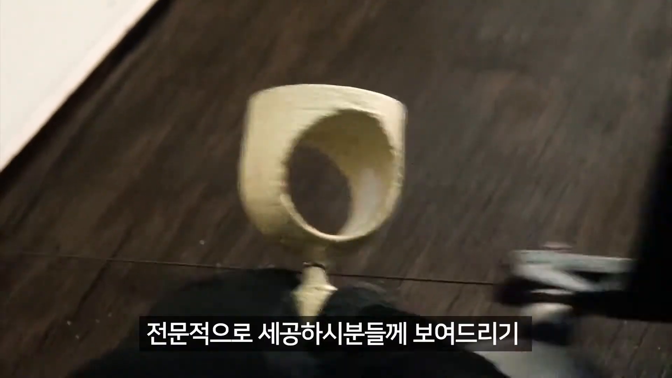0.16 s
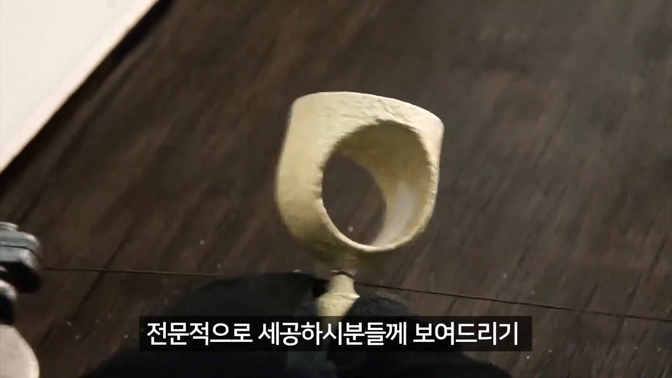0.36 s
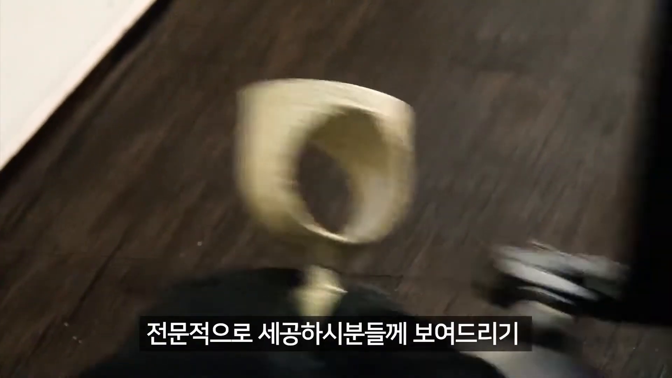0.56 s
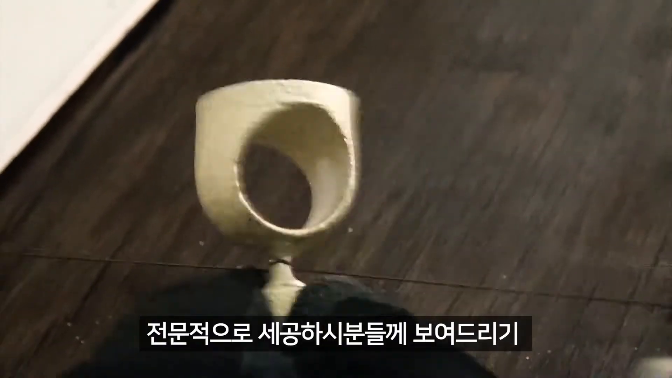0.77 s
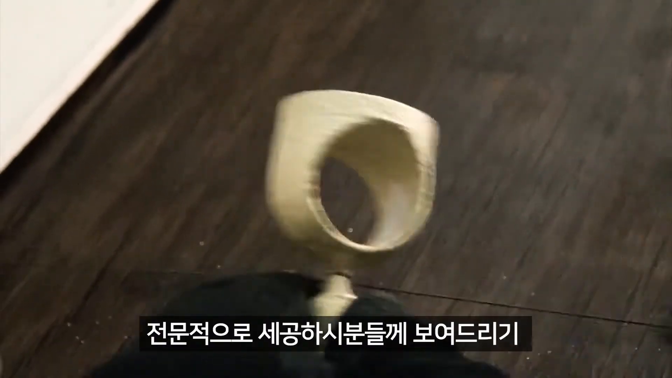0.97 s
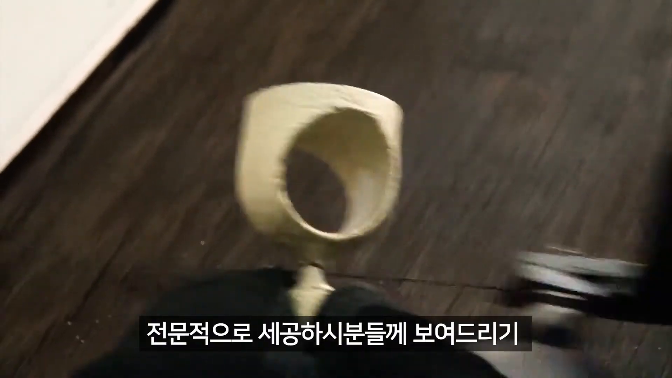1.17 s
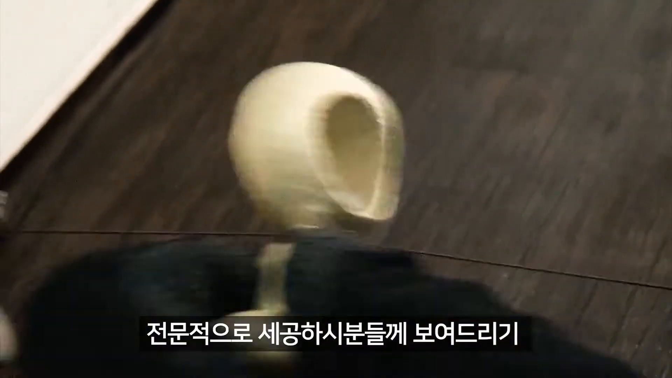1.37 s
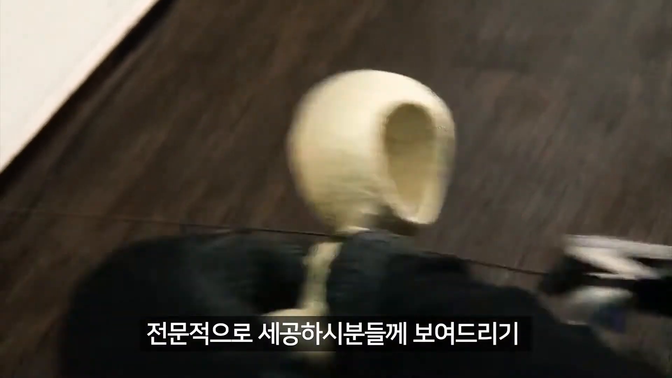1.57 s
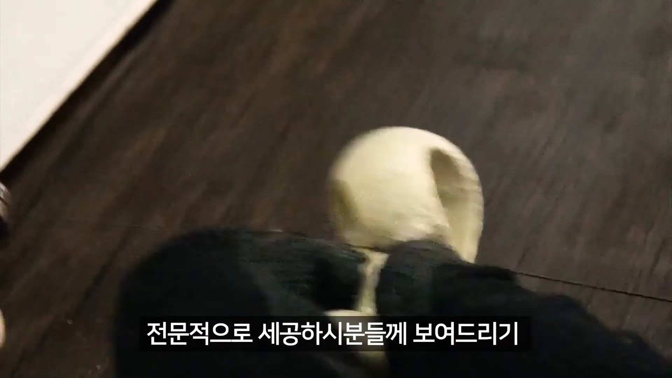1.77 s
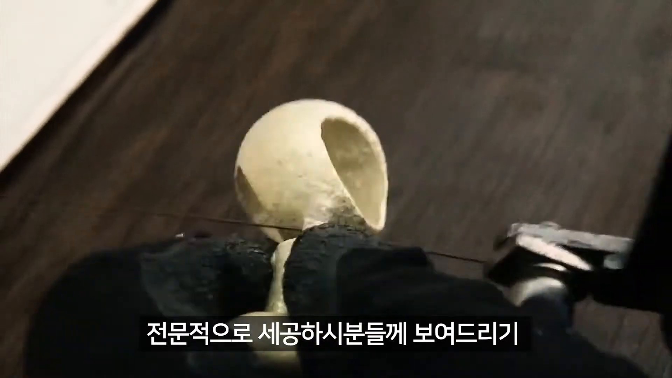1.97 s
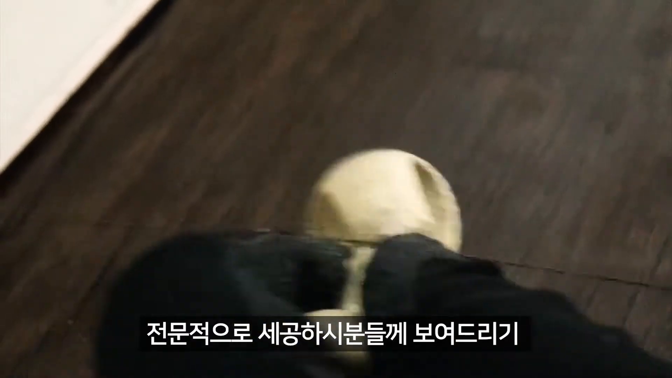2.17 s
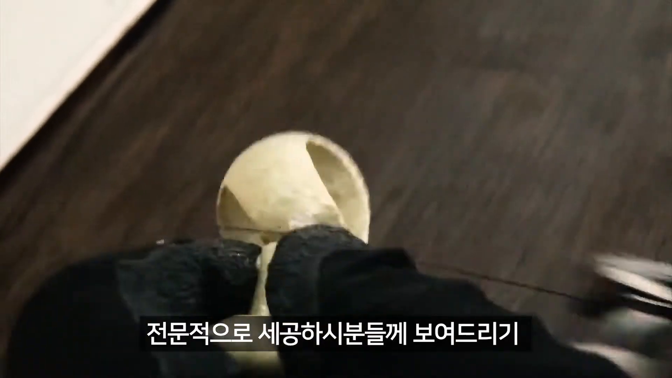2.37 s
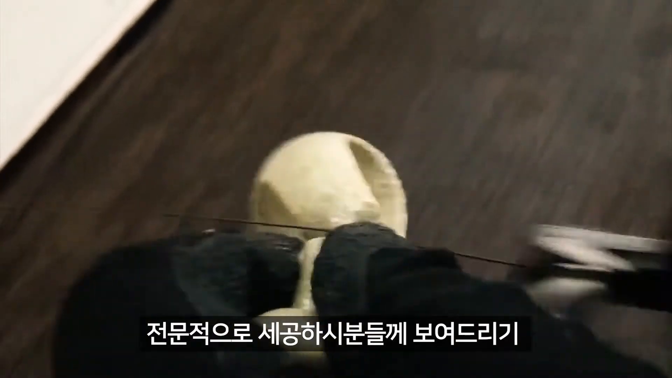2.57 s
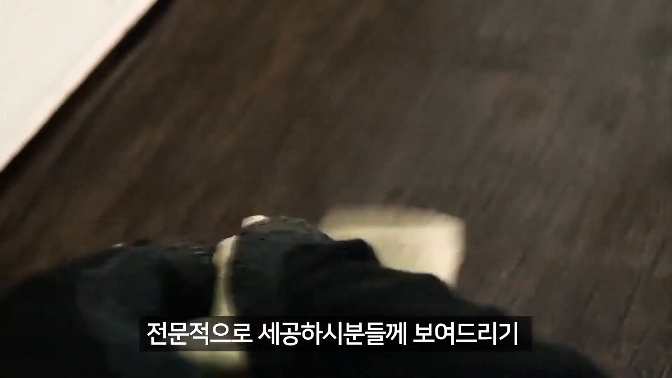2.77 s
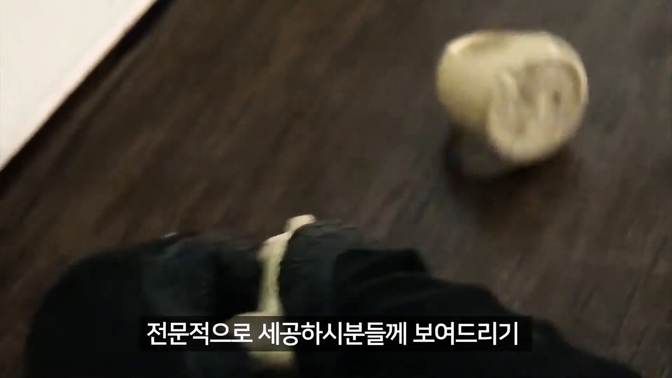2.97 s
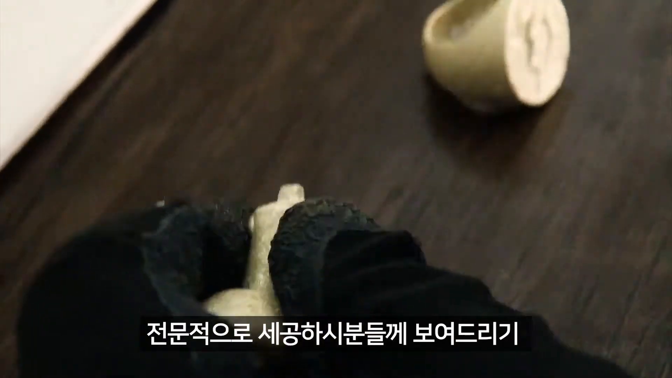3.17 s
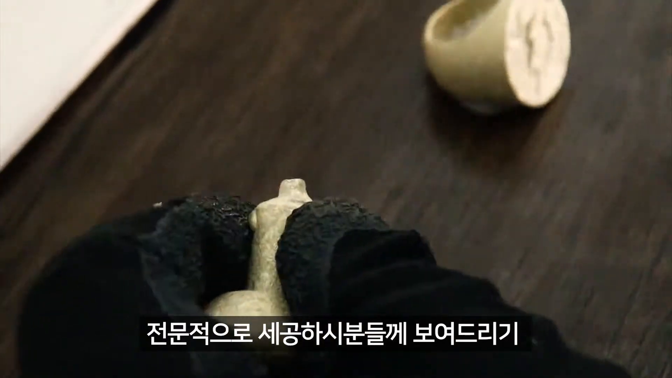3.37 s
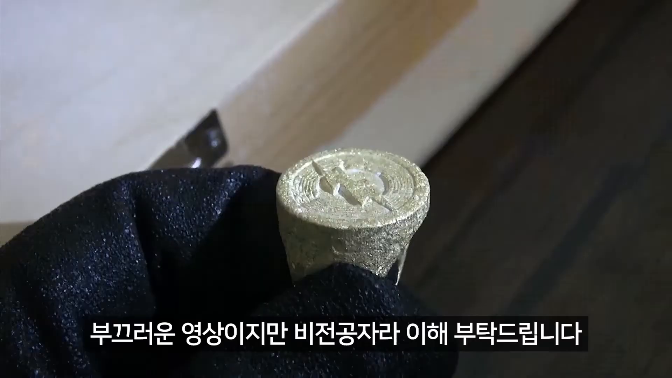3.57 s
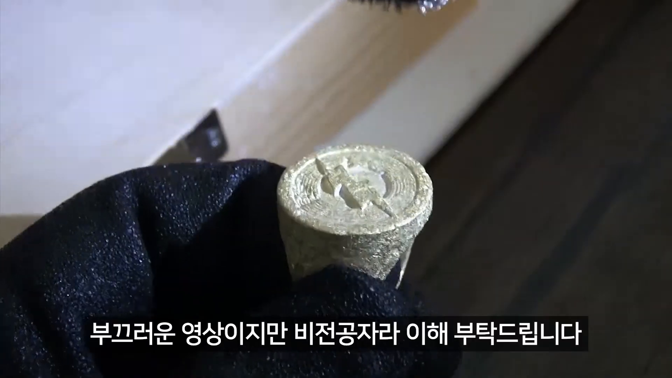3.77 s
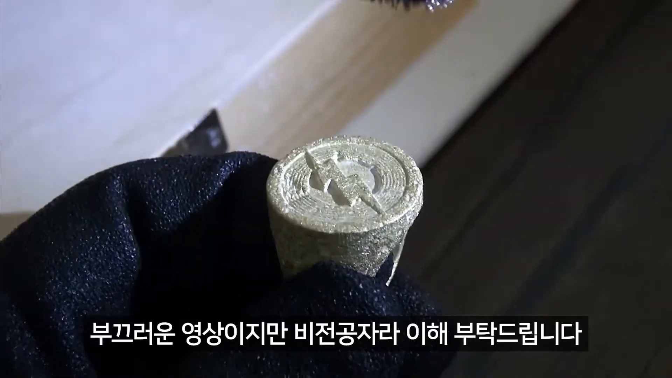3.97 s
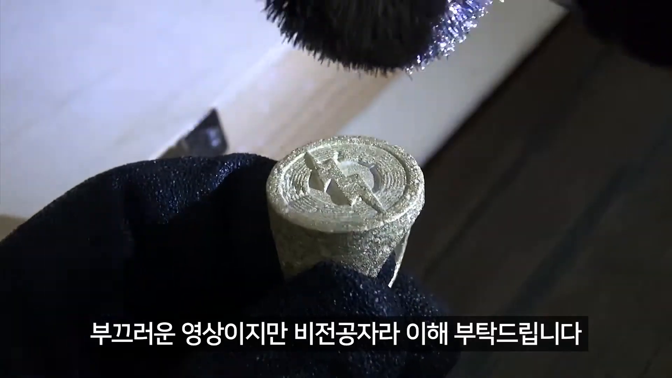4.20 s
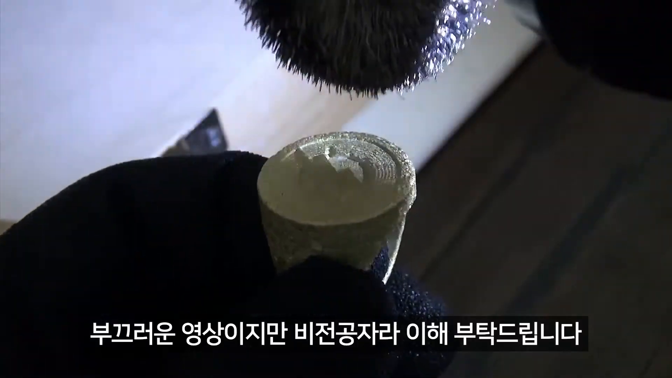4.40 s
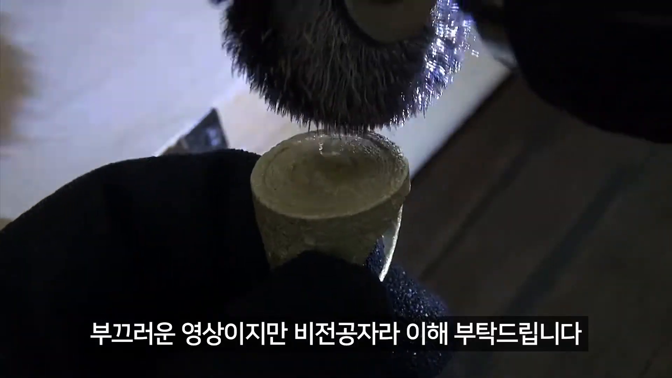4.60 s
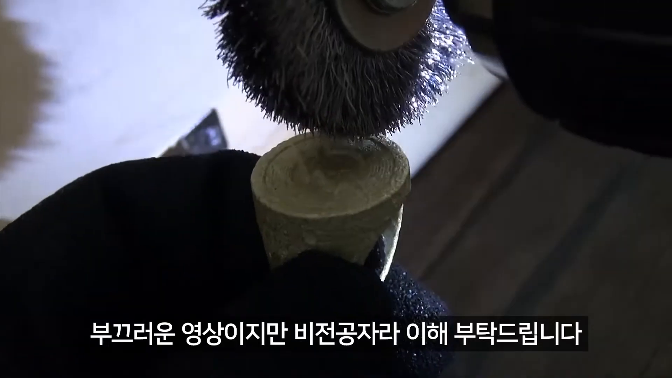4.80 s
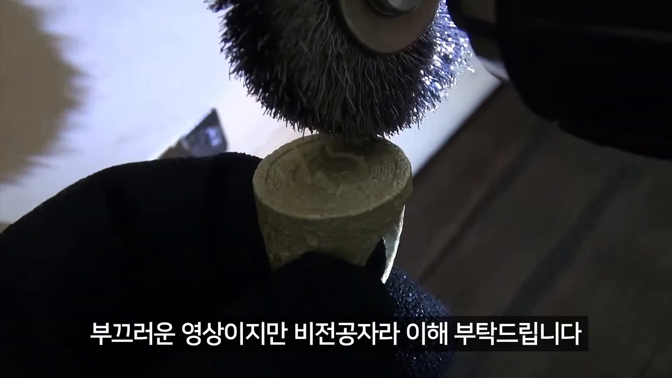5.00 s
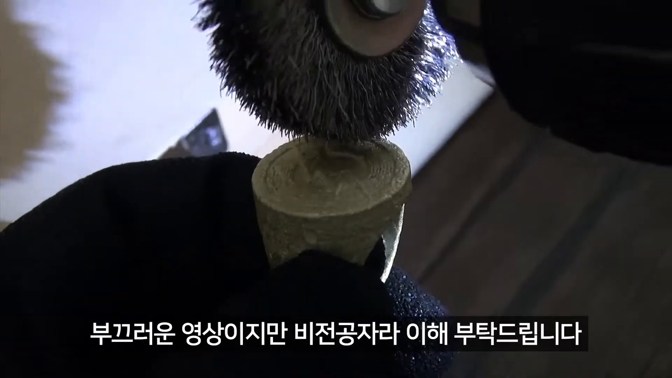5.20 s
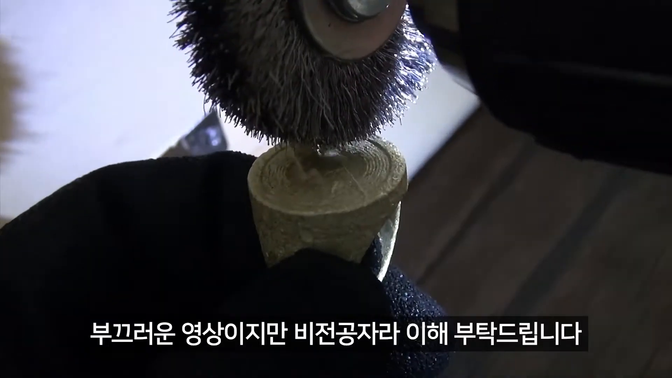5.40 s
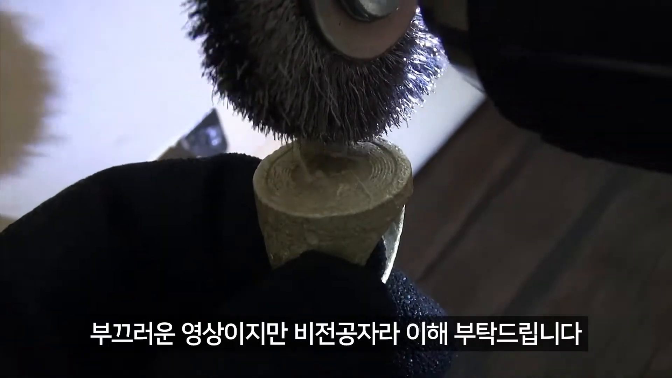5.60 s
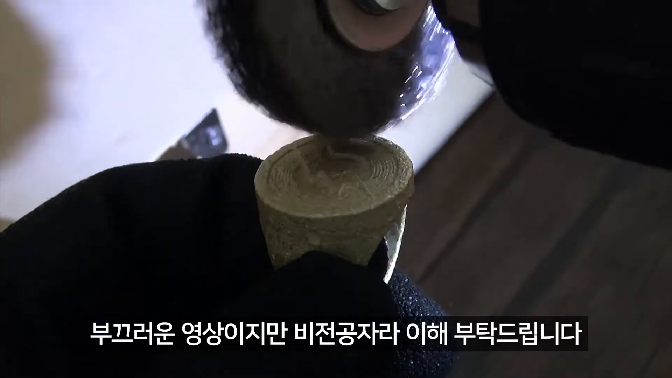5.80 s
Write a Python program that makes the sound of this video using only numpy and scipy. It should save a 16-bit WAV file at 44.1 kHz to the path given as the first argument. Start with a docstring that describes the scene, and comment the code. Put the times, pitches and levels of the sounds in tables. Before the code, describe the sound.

Close to the microphone, a fine saw rasps through a small metal casting in quick, regular strokes with squeaks and squeals over a low bench rumble. The stem snaps with a bright crackle, and the ring bounces and rolls on a wooden table until still. Near-silence follows, with a soft thud and tiny ticks, before a small rotary tool whines and its brush wheel hisses louder.

```python
"""Sawing a ring off its stem at a workshop bench

Close to the microphone a thin saw cuts a cast metal ring off its stem in quick strokes: tooth grit rasps,
blade modes squeal, the bench rumbles. The stem snaps in a crackle; the ring rattles over a wooden table as
knocked modes and rolling grit. Soft thuds and dry ticks follow, then a rotary tool starts: its speed control
whines in steady overtones while the wire wheel's banded hiss grows louder and duller. Faint hush lies below."""
import sys
import numpy as np
from scipy import signal
from scipy.fft import rfft, irfft, next_fast_len
from scipy.io import wavfile
from scipy.ndimage import uniform_filter1d, map_coordinates

SR = 44100
rng = np.random.default_rng(int(sys.argv[2]) if len(sys.argv) > 2 else 0)


def wrap_up_sound(samples):
    """Save the sound to the file named by the first command line argument, as 16-bit audio."""
    columns = np.atleast_2d(samples).T
    # keep every value between -1 and 1, then stretch to whole-number steps
    tamed = np.clip(columns, -1, 1)
    steps = np.round(tamed * 32767).astype(np.int16)
    wavfile.write(sys.argv[1], SR, steps)


N = 257984
T = np.arange(N) / SR  # seconds
SNAP_S, REST_S = 2.802, 3.62  # the stem snaps; the ring lies still
FULL_DB = -33  # rasp level of a firm bite
MODES_GROW = 0.6  # dB that modes and squeak gain per dB of bite, beyond the rasp

# Modes of blade and casting. Each row: centre in Hz, width in Hz, level in dB.
BLADE = [(1454, 71, -3), (2426, 90, 0.5), (4338, 58, 1.5), (4780, 60, -2), (5120, 83, -3.5),
         (5780, 78, -1.5), (6670, 29, 4.5), (8060, 110, -7.5), (9360, 49, -8), (10870, 14, 6)]
# Modes of the table top, with the ring's own sharp tone. Each row: centre in Hz, width in Hz, level in dB.
TABLE = [(187.8, 76, 6), (450, 67, 5), (577, 24, 7.5), (670, 25, 5.5), (934, 28, 7), (1173, 24.7, -0.5),
         (1505, 78, 0.5), (1835, 35, -2.5), (2030, 10.45, 1), (2230, 45, 3), (2522, 14, -1.5),
         (2700, 8, -3)]
# Saw strokes. Each row: start in seconds, bite in seconds, rasp level in dB, its rise over the bite in dB,
# body against rasp in dB, level of the sharp mode at its peak in dB, drive of the bench shake at its peak in dB.
STROKES = [(-.01, 0.092, -35, -3.5, -2, -35, -38.5), (0.145, 0.1, -37.5, 1, -4.5, -45, -50),
           (0.311, 0.1, -35.5, 3.5, 1, -38, -42.5), (0.484, 0.098, -36.5, 1, -4, -42.5, -46),
           (0.647, .11, -34.5, 0.5, 0, -30, -38), (0.838, 0.088, -37.5, -1.5, 0, -49, -30.5),
           (0.992, 0.094, -35, 4, 0, -32.5, -41.5), (1.158, 0.15, -38.5, -7.5, -1.5, -51, -38.5),
           (1.325, 0.11, -34, -1, -2, -39, -34), (1.542, 0.12, -33.5, -4, 0, -64, -36.5),
           (1.733, 0.056, -32, 6, 0.5, -35.5, -27), (1.903, 0.057, -34.5, 6.5, -0.5, -40, -19),
           (2.095, 0.11, -36, -7.5, -1, -62, -47), (2.292, 0.081, -37, -2, -4, -49, -35),
           (2.422, 0.062, -34.5, 1.5, 0.5, -56, -27.5), (2.601, 0.12, -36, -10, -4.5, -58, -28),
           (2.716, 0.083, -34.5, 3, -1.5, -48, -26.5)]
# The ring rolls. Each row: start in seconds, hold in seconds, level in dB, fade in dB per second,
# treble against it in dB, extra fade of the treble in dB per second.
ROLLS = [(2.827, 0.075, -17, 148, -2.5, 46.5), (3.036, 0.1, -26.5, 266, 0.5, 64),
         (3.224, 0.034, -46, 62, -5, 51)]


def amp(db):
    """dB to gain."""
    return 10 ** (np.asarray(db) / 20)


def unit(x):
    """Scaled to rms 1."""
    return x / np.sqrt(np.mean(x ** 2) + 1e-20)


def shape(points):
    """Gain over frequency from (Hz, dB) points on a log axis."""
    f, db = np.transpose(points)
    return lambda hz: amp(np.interp(np.log(hz + 1), np.log(f + 1), db))


def modes(rows):
    """Response of resonances (Hz, width in Hz, dB) summed with alternating sign."""
    def response(f):
        return sum((-1) ** k * amp(db) * 1j * f * width / (hz * hz - f * f + 1j * f * width)
                   for k, (hz, width, db) in enumerate(rows))
    return response


def above(hz):
    """Second-order high-pass."""
    return lambda f: (1j * f / (hz + 1j * f)) ** 2


def filtered(x, response):
    """x times a response of frequency."""
    m = next_fast_len(len(x) + SR // 2)
    return irfft(rfft(x, m) * response(np.fft.rfftfreq(m, 1 / SR)), m)[:len(x)]


def curves(rows):
    """One value per sample for each column after the time; the first is silent outside the table."""
    s, first, *rest = np.transpose(rows)
    return [np.interp(T, s, first, left=-120, right=-120)] + [np.interp(T, s, c) for c in rest]


def peaks(times, dbs, rise, fall):
    """Level in dB that climbs to each peak and falls away, rise and fall in dB per second."""
    return np.max([db - np.maximum(rise * (s - T), fall * (T - s)) for s, db in zip(times, dbs)], axis=0)


def wobble(rate):
    """A smooth random curve, rate knots a second."""
    return map_coordinates(rng.standard_normal(int(N * rate / SR) + 4), [T * rate])


def grit(rate, spread_db):
    """Random contacts, rate a second, of unequal size, at rms 1."""
    hit = rng.random(N) < rate / SR
    return unit(hit * rng.standard_normal(N) * amp(spread_db * rng.standard_normal(N)))


def patchy(x, depth_db):
    """Random gain in patches of time and frequency."""
    z = signal.stft(x, nperseg=256)[2]
    field = uniform_filter1d(rng.standard_normal(z.shape), size=3, axis=0)
    field = uniform_filter1d(field, size=6, axis=1)
    return signal.istft(z * amp(depth_db * unit(field)), nperseg=256)[1][:N]


def bursts(times, dbs, t60):
    """Puffs of noise that start at the given levels and lose 60 dB in t60 seconds."""
    out, t = np.zeros(N + SR), T[:SR // 8]
    for s, db in zip(times, dbs):
        out[round(s * SR):][:len(t)] += amp(db - 60 * t / t60) * rng.standard_normal(len(t))
    return out[:N]


def hush():
    """Quiet workshop air and microphone hiss: coloured noise at a slowly drifting level."""
    # Each row: frequency in Hz, relative level per Hz in dB.
    colour = [(20, -32), (49, -6), (172, -4), (386, -9.5), (586, -13.5), (775, -16), (2240, -18.5),
              (15800, -23.5)]
    return amp(-58 + 0.41 * wobble(0.99)) * unit(filtered(rng.standard_normal(N), shape(colour)))


def room(x):
    """A short dull tail from the walls: decaying noise, 7 ms late."""
    t = T[:SR // 3]
    tail = amp(-60 * t / 0.16) * rng.standard_normal(len(t))
    wet = signal.fftconvolve(np.pad(x, (300, 0)), tail / np.linalg.norm(tail))[:N]
    return filtered(wet, lambda f: 1 / (1 + 1j * f / 3000))


def ticks(rows, t60):
    """Tiny dry ticks: noise puffs, each through one broad resonance of its own."""
    return sum(filtered(bursts([s], [db], t60), modes([(hz, 0.46 * hz, 0)])) for s, db, hz in rows)


def thuds():
    """Soft pushes pass through hand and bench, so the ring swells before it dies; a faint tap rides on each."""
    # Pushes on the bench. Each row: time in seconds, level in dB.
    pushes = [(4.386, -39.5), (4.4, -7), (4.428, -25), (4.454, -17), (4.491, -21), (4.514, -36),
              (4.55, -43), (4.58, -42)]
    # Bench modes. Each row: centre in Hz, width in Hz, level in dB.
    bench_modes = [(93, 11, -7.5), (194, 190, 21), (290, 25, 13)]
    puff_db, tap_db = -14, -21.5  # woody body and tap, both against the push
    s, db = np.transpose(pushes)
    push = np.zeros(N)
    push[np.round(s * SR).astype(int)] = amp(db)
    # squared responses swell before they die
    soft = filtered(push, lambda f: modes(bench_modes)(f) ** 2 * modes([(225, 170, 0)])(f) ** 2)
    soft *= push.max() / np.abs(soft).max()
    puff = bursts(s, db + puff_db, t60=0.64)
    soft += filtered(puff, lambda f: modes([(330, 300, 0)])(f) ** 2 + modes([(80, 70, 6)])(f) ** 2)
    tap = bursts(s, db + tap_db, t60=0.088)
    return soft + filtered(tap, lambda f: modes([(1750, 600, 2), (850, 150, -4)])(f) / (1 + 1j * f / 4000))


def tool():
    """The chopped supply sings in the windings and dips once; the wheel hisses ever louder and duller."""
    # Supply whine. Each row: time in seconds, level in dB, then overtones 2, 3 and 4 against it in dB.
    whine_levels = [(5.6095, -25.5, -8, -19, -21.5), (5.679, -28.5, -10.5, -16.5, -35),
                    (5.85, -24.5, -6.5, -17, -27.5)]
    # Wheel hiss. Each row: time in seconds, level in dB, treble against its low band in dB.
    wheel_levels = [(5.612, -73, 19.5), (5.68, -51, 8.5), (5.79, -37, 0), (5.85, -29, -1)]
    # Colour of the wheel. Each row: frequency in Hz, relative level per Hz in dB.
    wheel_colour = [(150, 2), (400, 11.5), (1100, 7.5), (2500, 6.5), (6000, -11.5), (9000, -16),
                    (15000, -32)]
    # The rotor jerks from pole to pole. Each row: time in seconds, level before filtering in dB, centre in Hz.
    cogs = [(5.608, -36, 6700), (5.625, -33, 2440), (5.672, -31.5, 2340), (5.699, -29, 2520),
            (5.7262, -28.5, 4500), (5.753, -29, 2200), (5.765, -28, 6500), (5.782, -33, 1200),
            (5.81, -32, 1200), (5.828, -21, 1800)]

    db, *overtones = curves(whine_levels)
    phase = 2 * np.pi * 3936 * T
    whine = np.sin(phase)
    for k, overtone_db in enumerate(overtones, start=2):
        whine = whine + amp(overtone_db + 2.0 * wobble(90)) * np.cos(k * phase)
    gap = 1 - 0.8 * np.exp(-((T - 5.7245) / 0.0018) ** 4)
    gap *= np.clip((T - whine_levels[0][0]) / .002, 0, 1)  # the current rises in 2 ms

    def band(cut):
        bristles = patchy(grit(5000, spread_db=-3.5), depth_db=4.0)
        return unit(filtered(bristles, lambda f: shape(wheel_colour)(f) * cut(f)))

    wheel_db, treble_db = curves(wheel_levels)
    growl = band(lambda f: 1 / (1 + (f / 900) ** 4))
    low = band(lambda f: 1 / (1 + (f / 3800) ** 6) / (1 + (1000 / (f + 1)) ** 4))
    high = band(lambda f: 1 / (1 + (3800 / (f + 1)) ** 6))
    growl_db = -9.5 - (treble_db - wheel_levels[-1][2])  # the bass comes in as the treble gives way
    mix = low + amp(treble_db) * high + amp(growl_db) * growl
    # each jerk swells the hiss by up to 5 dB
    jerk_db = np.maximum(peaks([row[0] for row in cogs], np.zeros(len(cogs)), 2500, 400), -5)
    hiss = amp(wheel_db + jerk_db + 1.3 * wobble(110)) * mix
    jerks = ticks(cogs, t60=.028)
    return np.sqrt(2) * amp(db + wobble(120) * 0.44) * gap * whine + hiss + jerks


def shake():
    """The bench's lumpy low rumble: noise in a low band, at rms 1."""
    # Each row: frequency in Hz, relative level per Hz in dB.
    colour = [(20, -11.5), (75, 6.5), (123, 5.5), (193, 9.5), (236, 3), (400, -3.5), (520, -53),
              (880, -120)]
    return unit(amp(2.5 * wobble(28)) * filtered(rng.standard_normal(N), shape(colour)))


def snap():
    """The last sliver of the stem tears in a short bright crackle of three bursts through its modes."""
    # Modes of the breaking stem. Each row: centre in Hz, width in Hz, level in dB.
    stem = [(1440, 120, 5.5), (2875, 50, 6), (3370, 230, -1.5), (4800, 100, -6), (6500, 35, -10),
            (7000, 53, -0.5), (7240, 116, -7), (9400, 380, -4), (13000, 69, -1)]
    crackle = bursts([2.802, 2.806, 2.811], [-11, -15, -24], t60=.03)
    return filtered(crackle, lambda f: above(950)(f) * (.5 / (1 + (f / 14000) ** 8) + 3.9 * modes(stem)(f)))


def rolling():
    """Gain of the roll and of its treble: a quick start, a hold, a steady fade."""
    attack_s = 0.0069
    low, high = np.zeros(N), np.zeros(N)
    for s, hold, db, fade, treble, dull in ROLLS:
        gain = amp(db - fade * np.clip(T - s - hold, 0, 1))
        gain *= np.clip((T - s) / attack_s, 0, 1) * (T < REST_S)
        low += gain
        high += gain * amp(treble - dull * np.clip(T - s, 0, 1))
    return low, high


def knock(s, db, hz):
    """A blow with some chatter rings the table's modes near its own centre; the resting ring damps them."""
    damping_db = 340  # dB per second on top of the modes' own decay
    out, t = np.zeros(N), T[:SR // 4]
    blow = 0.49 * amp(-60 * t / 0.02) * np.tanh(t / 0.0014) * rng.standard_normal(len(t))
    blow[SR // 800] += 3
    near = lambda f: 0.12 + modes([(hz, .9 * hz, 0)])(f) ** 2
    rung = filtered(blow, lambda f: modes(TABLE)(f) * near(f) / (1 + 1j * f / 1500))
    out[round(s * SR):][:len(t)] = amp(db - damping_db * t) * rung
    return out


def tumble():
    """The ring chatters on the table top: grit rolls and scrapes, each bounce knocks table modes and clicks."""
    # Response of the table top under its modes. Each row: frequency in Hz, relative level per Hz in dB.
    wood_colour = [(35, -45), (60, 6), (408, 15.5), (798, 11.5), (2590, 14), (12800, -49), (15000, -62)]
    # Bounces of the ring. Each row: time in seconds, level before the modes in dB, click against it in dB,
    # centre of the knock in Hz.
    bounces = [(2.831, 17, -39, 410), (2.881, 9.5, -14, 593), (2.899, 15.5, -30, 640),
               (2.939, 11.5, -29, 926), (3.029, 10.5, -29, 935), (3.039, 20, -13, 1880),
               (3.075, 20.5, -11, 2160), (3.097, 14.5, -13.5, 1900), (3.116, 12, -10, 940),
               (3.131, 10, -17.5, 1000), (3.224, 1.5, -16.5, 920), (3.247, -8, -12.5, 546),
               (3.26, -10, -25.5, 603), (3.287, -3.5, -42, 193), (3.329, -6, -29, 550),
               (3.347, -6, -25, 435), (3.354, -5, -18.5, 930), (3.385, -12, -40, 370),
               (3.416, -4, -16.5, 890), (3.443, -7.5, -44, 540), (3.485, -3, -38, 196.6),
               (3.534, -10, -24, 700), (3.56, -6.5, -21.5, 674), (3.612, -24.5, -6, 597)]
    rock_db, rock_fade_db = -9, 14  # faint rocking knocks: first level, loss per second
    boom_db, boom_fade_db = -14, 29  # bench shake under the roll: level at the snap, loss per second
    wood = lambda f: shape(wood_colour)(f) + 3.1 * np.abs(modes(TABLE)(f))
    low, high = amp(0.63 * wobble(45)) * np.array(rolling())  # it rolls in lumps

    contacts = patchy(grit(2452, spread_db=1.0), depth_db=2.5)
    roll = low * unit(filtered(contacts, lambda f: wood(f) / (1 + (f / 1700) ** 4)))
    contacts = patchy(grit(4800, spread_db=-3.5), depth_db=2.0)
    edge = lambda f: wood(f) + 0.5 * np.abs(modes([(3500, 1500, 0)])(f))
    scrape = high * unit(filtered(contacts, lambda f: edge(f) * above(1800)(f)))

    knocks = sum(knock(s, db, hz) for s, db, _, hz in bounces)
    start = ROLLS[-1][0]
    for when, size, pitch in rng.random((10, 3)):  # the ring rocks to rest
        late = when * (REST_S - start)
        knocks += knock(start + late, rock_db - rock_fade_db * late - 8 * size, 200 * 3.2 ** pitch)
    s, db, click_db, _ = np.transpose(bounces)
    clacks = bursts(s, db + click_db, t60=0.02)
    clicks = filtered(clacks, lambda f: above(1500)(f) * (0.034 / (1 + 1j * f / 4000) ** 2 + modes(TABLE)(f)))
    boom = amp(boom_db - boom_fade_db * (T - SNAP_S)) * low * shake()
    return roll + scrape + knocks + clicks + boom


def glides():
    """Teeth catch evenly and their rate sings: rough overtones, the second loudest, levelling off in pitch."""
    # Each row: start in seconds, length in seconds, first and last tooth rate in Hz, level before flutter in dB.
    catches = [(0.552, 0.0253, 1820, 2130, -35.5), (1.236, 0.0215, 1850, 2130, -30.5),
               (1.586, 0.0574, 1660, 1394, -30.5), (1.913, 0.053, 2080, 2940, -35.5),
               (2.138, 0.04, 2330, 2720, -37.5), (2.302, 0.047, 1107, 1510, -41),
               (2.312, 0.026, 2363, 2205, -32.5), (2.423, 0.045, 2080, 2590, -38),
               (2.439, 0.05, 1430, 1743, -40.5), (2.608, 0.04, 2490, 2920, -32),
               (2.739, 0.026, 2150, 2460, -38), (1.632, 0.1, 3350, 3610, -43),
               (2.103, 0.035, 2083, 2270, -46), (1.571, 0.029, 1810, 2050, -32.5),
               (1.736, 0.027, 2040, 2215, -41), (2.292, 0.017, 2010, 2180, -39),
               (1.919, 0.022, 1675, 1510, -36.5)]
    out, rough, broken = np.zeros(N), wobble(200), wobble(150)
    for s, length, first_hz, last_hz, db in catches:
        i = slice(round(s * SR), round((s + length) * SR))
        u = (T[i] - s) / length
        hz = first_hz + (last_hz - first_hz) * np.sin(np.pi / 2 * u)
        phase = 2 * np.pi * np.cumsum(hz * (1 + 0.018 * rough[i])) / SR
        tone = .5 * np.sin(phase) + np.sin(2 * phase) + .2 * np.sin(3 * phase) + .1 * np.sin(4 * phase)
        out[i] += amp(db + 3.5 * broken[i]) * np.sin(np.pi * u) * tone
    return out


def squeals():
    """Blade modes flare up: each swells fast, dies more slowly, bends a little in pitch and flutters."""
    # The loudest flares. Each row: peak time in seconds, pitch in Hz, peak before flutter in dB, rise in seconds.
    flares = [(0.031, 5800, -34, 0.011), (0.044, 898, -34, 0.037), (0.097, 2460, -34, 0.021),
              (0.387, 5740, -36, 0.0098), (0.724, 5850, -40, .02), (1.067, 880, -31, .022),
              (1.071, 4360, -32.5, 0.012), (1.081, 10800, -41, 0.01), (1.4, 5800, -35.5, 0.013),
              (1.567, 4390, -29, 0.027), (1.578, 5840, -33.5, .022), (1.606, 5050, -27.5, 0.0058),
              (1.621, 4440, -29.5, .015), (1.645, 6650, -29.5, 0.011), (1.766, 4314, -34.5, .028),
              (1.937, 4330, -33.5, .025), (1.955, 3020, -36.5, .03), (1.971, 6680, -34, .022),
              (1.915, 6700, -37, 0.015), (0.498, 899, -36, .015), (2.49, 3540, -43, 0.018),
              (2.372, 4270, -40, .016), (2.608, 6780, -38, 0.0052), (2.64, 4340, -32, 0.015),
              (2.75, 6620, -34.5, 0.012), (2.335, 2500, -38, 0.013), (2.346, 9240, -35.5, 0.0074),
              (2.119, 4380, -34.5, .013), (2.342, 4320, -25, 0.01), (2.645, 5820, -38.5, .022),
              (2.649, 5120, -32.5, 0.014), (2.743, 5240, -36, .013)]
    faint_db, spread_db, faint_rise_s = -8, 3, .008  # fainter flares against the rasp
    faint = []
    for s, bite, db, *_ in STROKES[1:]:
        for at, mode, size, life in rng.random((3, 4)):  # three a stroke
            hz, _, mode_db = BLADE[int(mode * len(BLADE))]
            level = db + mode_db + faint_db - spread_db * 2 * size
            faint.append((s + at * bite, hz, level, faint_rise_s * (.5 + life)))
    rows = flares + faint

    out, t = np.zeros(N + SR), T[:SR // 4]
    for (s, hz, db, rise), (bend, turn) in zip(rows, rng.standard_normal((len(rows), 2))):
        u = t / rise
        swell = u ** 2 * np.exp(2 * (1 - u))
        pitch = hz * (1 + 0.007 * bend * np.tanh(u - 1))
        start = max(round((s - rise) * SR), 0)
        out[start:][:len(t)] += amp(db) * swell * np.sin(2 * np.pi * (np.cumsum(pitch) / SR + turn))
    return out[:N] * amp(3.0 * wobble(350))


def chirps(rate):
    """Many short, bending rings of chips and blade, rate a second, at rms 1 up to the snap."""
    out, t = np.zeros(N + SR), T[:SR // 16]
    for when, pitch, bend, life, size in rng.random((int(rate * SNAP_S), 5)):
        hz = 1200 * 9 ** pitch * (1 + 1.856 * (bend - .4) * t)
        u = t / (0.0094 + 0.031 * life)
        ring = u * np.exp(1 - u) * np.sin(2 * np.pi * np.cumsum(hz) / SR)
        out[int(when * SNAP_S * SR):][:len(t)] += amp(4.6 * size - 8 * pitch) * ring
    return out[:N] / np.std(out[:int(SNAP_S * SR)])


def squeak():
    """A thin squeak: a narrow band of noise whose pitch holds through each stroke, at rms 1."""
    # Each row: start of the stroke in seconds, pitch in Hz.
    pitches = [(1.33, 15600), (1.54, 15300), (1.9, 14500), (2.3, 13900), (2.72, 13750)]
    width_hz = 160
    starts = np.array([row[0] - .02 for row in STROKES])
    hz = np.interp(starts, *np.transpose(pitches))[np.searchsorted(starts, T) - 1]
    phase = 2 * np.pi * np.cumsum(hz) / SR
    return unit(wobble(width_hz * 2) * np.sin(phase) + wobble(width_hz * 2) * np.cos(phase))


def strokes(drag_db, fade_db):
    """Rasp and body level: a stroke bites at once, arches, then fades fade_db a second to a light drag."""
    arch_db = 4  # a bite is weaker at both ends
    rasp_db, body_db = np.full(N, float(drag_db)), np.zeros(N)
    for s, bite, db, rise, body, *_ in STROKES:
        first, last = db - arch_db - rise / 2, db - arch_db + rise / 2
        times = s + np.array([-.014, .007, bite / 2, bite, bite + 1])
        rasp_db = np.maximum(rasp_db, np.interp(T, times, [first - 19, first, db, last, last - fade_db]))
        body_db[T > s - .02] = body
    return np.where(T < SNAP_S, rasp_db, -120), uniform_filter1d(body_db, size=800)


def rasping(rasp_db):
    """Tooth grit; its treble and the blade's modes need a firm bite, and each mode comes and goes on its own."""
    # Colour of the grit. Each row: frequency in Hz, relative level per Hz in dB.
    colour = [(530, -44.5), (900, -7.5), (1470, 4), (3790, -0.5), (4380, -2), (10000, -4.5), (12900, -3),
              (15800, -35.5)]
    treble_grows = 0.3  # dB per dB of bite, beyond the rasp
    drive = patchy(grit(6000, spread_db=1.5), depth_db=2.0)
    firm = rasp_db - FULL_DB
    low = lambda f: 1 / (1 + (f / 7000) ** 4)
    plain = filtered(drive, lambda f: shape(colour)(f) * low(f))
    plain += amp(treble_grows * firm) * filtered(drive, lambda f: shape(colour)(f) * (1 - low(f)))
    come_and_go = [amp(5 * wobble(22)) for _ in BLADE]
    rings = sum(gain * filtered(drive, modes([row])) for gain, row in zip(come_and_go, BLADE))
    return unit(plain + amp(5.0 + MODES_GROW * firm) * rings)


def saw():
    """Teeth and chips ring blade and casting; each bite builds up the sharp mode and shakes the bench in lumps."""
    # Colour of the body noise. Each row: frequency in Hz, relative level per Hz in dB.
    body_colour = [(150, -13), (250, -9.5), (426, -5.5), (517, -6.5), (881, -7.5), (1140, -21.5),
                   (1500, -15), (1950, -53), (3300, -120)]
    # The snap and the second landing ring the sharp mode too. Each row: time in seconds, level in dB.
    struck = [(2.81, -42), (3.08, -57)]
    # The saw frame jolts the bench off the beat of the bites. Each row: time in seconds, shake drive in dB.
    jolts = [(.635, -29), (.858, -34), (.975, -43), (1.86, -30), (2.169, -33.5)]
    # The bench's lowest mode, which rings on after a shake. Each row: centre in Hz, width in Hz, level in dB.
    leg = [(78, 5.75, 7)]
    ring_hz, free_hz = 12530, 13050  # sharp mode; a second one that sounds once the stem is off
    ring_fall = 125  # dB per second, both sharp modes

    rasp_db, body_db = strokes(drag_db=-46.5, fade_db=172.0)
    rasp = rasping(rasp_db)
    body = unit(amp(1.2 * wobble(60)) * filtered(rng.standard_normal(N), shape(body_colour)))
    ring_phase = 2 * np.pi * np.cumsum(ring_hz + 7 * wobble(70)) / SR
    ring = np.sqrt(2) * amp(2.2 * wobble(70)) * np.sin(ring_phase)
    squeak_db = -16.5 + MODES_GROW * (rasp_db - FULL_DB)  # against the rasp
    layers = amp(0.4 * wobble(90.57)) * rasp + amp(body_db) * body + amp(squeak_db) * squeak()
    cut = amp(rasp_db) * layers + amp(rasp_db - 8) * chirps(rate=160)

    s, bite, *_, ring_db, shake_db = np.transpose(STROKES)
    hit_s, hit_db = np.transpose(struck)
    jolt_s, jolt_db = np.transpose(jolts)
    # the sharp mode peaks at 0.79 of the bite, the shake at its end
    ring_db = peaks(np.r_[s + 0.79 * bite, hit_s], np.r_[ring_db, hit_db], 310, ring_fall)
    shake_db = peaks(np.r_[s + bite, jolt_s], np.r_[shake_db, jolt_db], 158, 220)
    free_db = peaks(hit_s, hit_db + 5, 2000, ring_fall)
    cut += amp(free_db + 1.6 * wobble(70)) * np.sin(2 * np.pi * free_hz * T)
    steady = amp(-49) * (T < SNAP_S)  # the bench shakes a little between bites
    bench = (amp(shake_db) + steady) * shake()
    return cut + amp(ring_db) * ring + bench + filtered(bench, modes(leg))


def scene():
    """All sources; the hits also sound in the room."""
    # Small knocks and ticks. Each row: time in seconds, level before filtering in dB, centre in Hz.
    small_ticks = [(0.855, -5, 427), (1.9, -31, 6000), (3.7795, -40.5, 1830), (4.411, -28, 2170),
                   (5.0674, -40.5, 1740), (5.084, -37, 3100), (5.3769, -44.5, 2900), (5.434, -45, 2030),
                   (5.5223, -46.5, 6970), (5.579, -38, 1880)]
    hits = snap() + tumble() + thuds() + ticks(small_ticks, t60=0.069)
    echo = amp(-13) * room(hits)
    return (saw() + squeals() + glides() + hits + echo + tool() + hush())[None]


def record(dry):
    """The microphone channel rounds off the loudest peaks and keeps nothing above its band limit."""
    soft = dry[0] / (1 + np.abs(dry[0] / .55) ** 10) ** (1 / 10)
    return filtered(soft, lambda hz: hz < 15830)[None]


dry = scene()
out = record(dry)
wrap_up_sound(out)
```